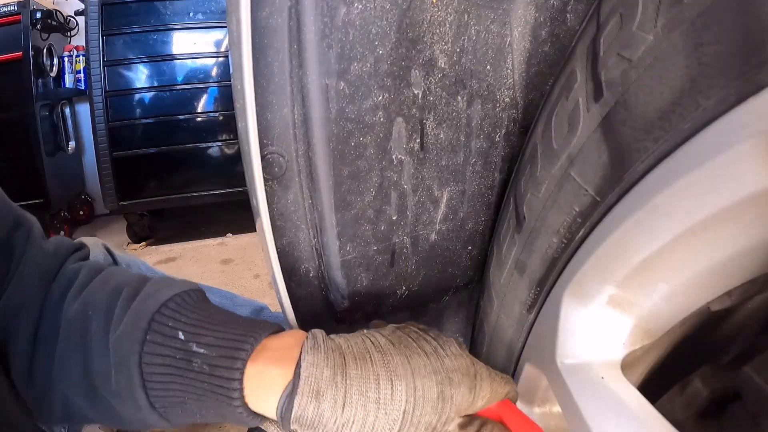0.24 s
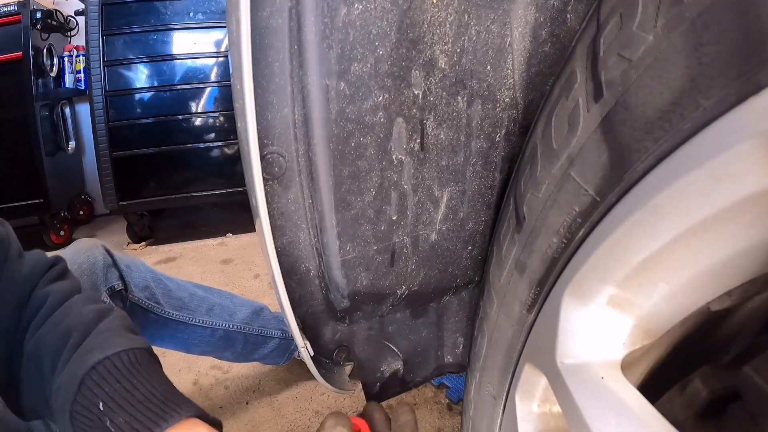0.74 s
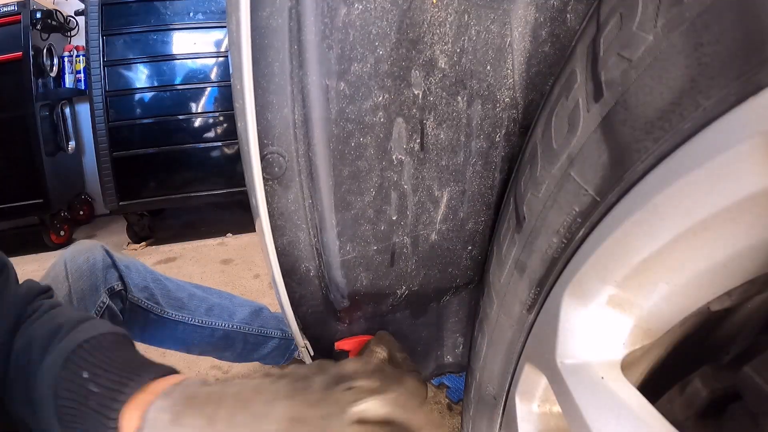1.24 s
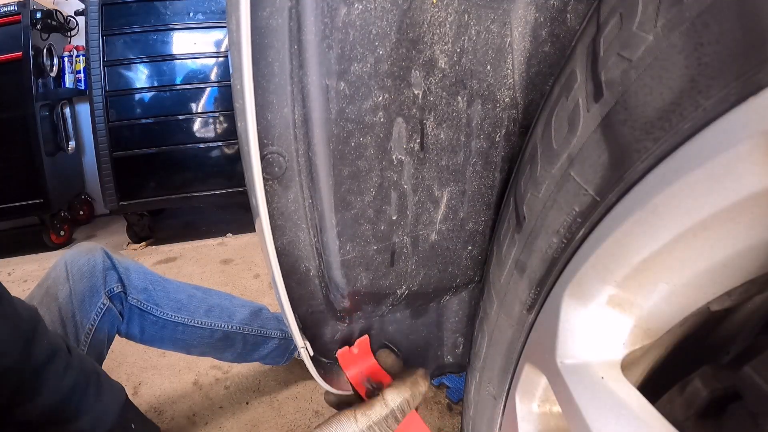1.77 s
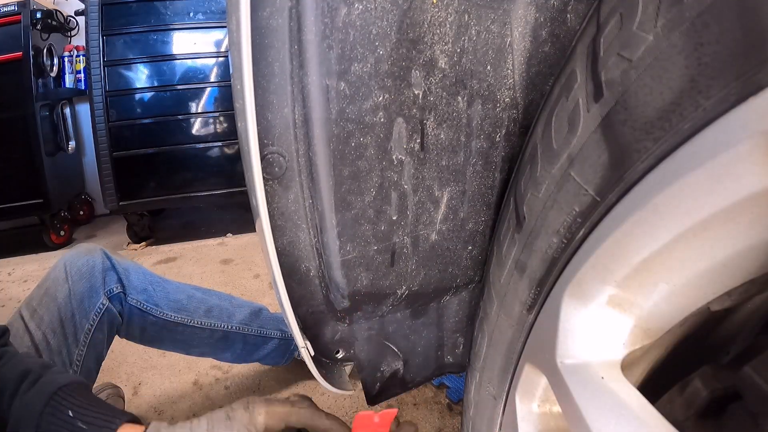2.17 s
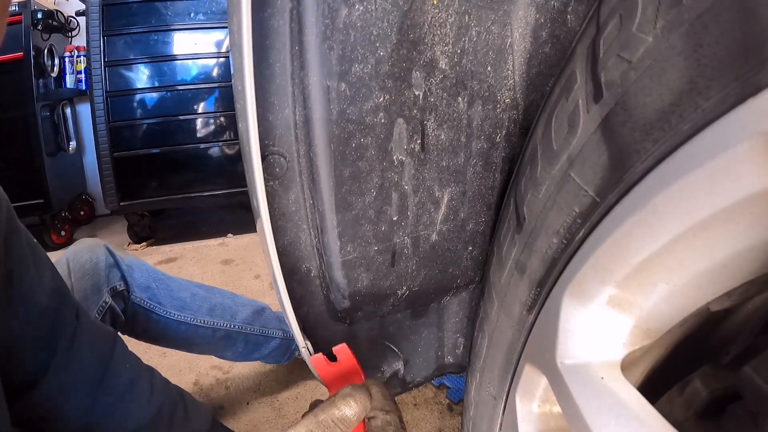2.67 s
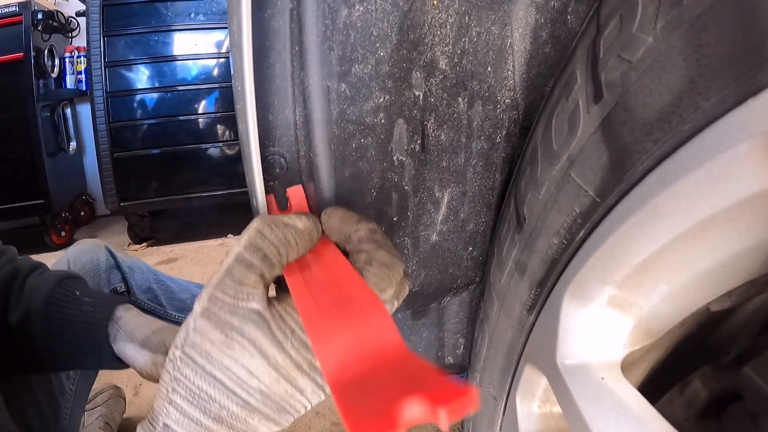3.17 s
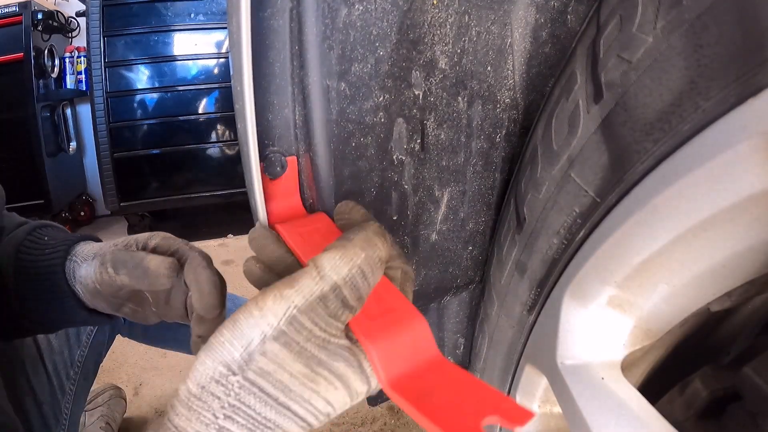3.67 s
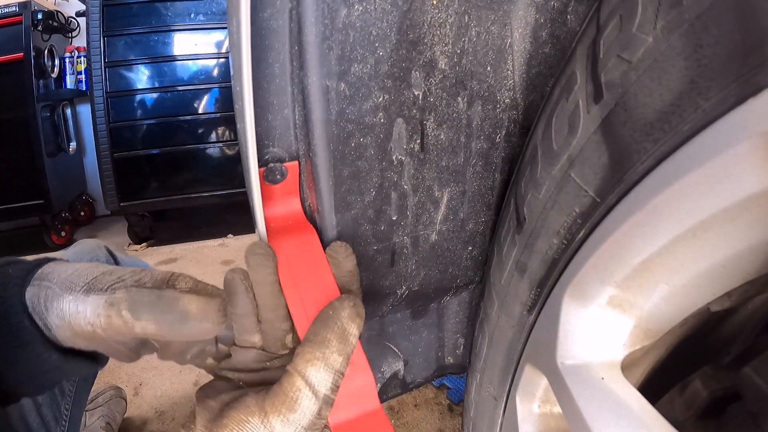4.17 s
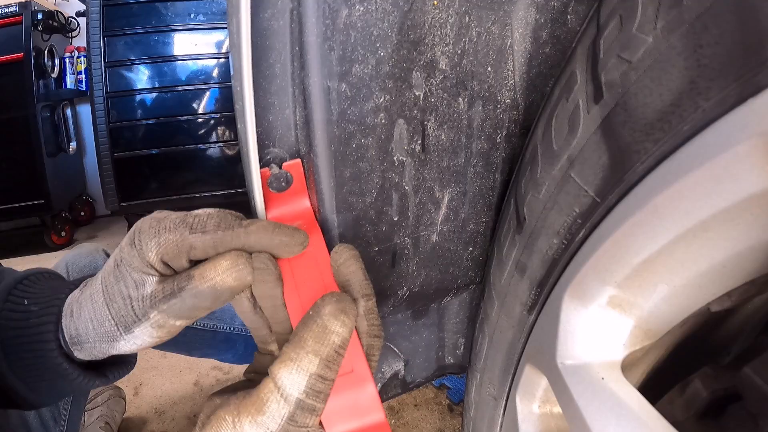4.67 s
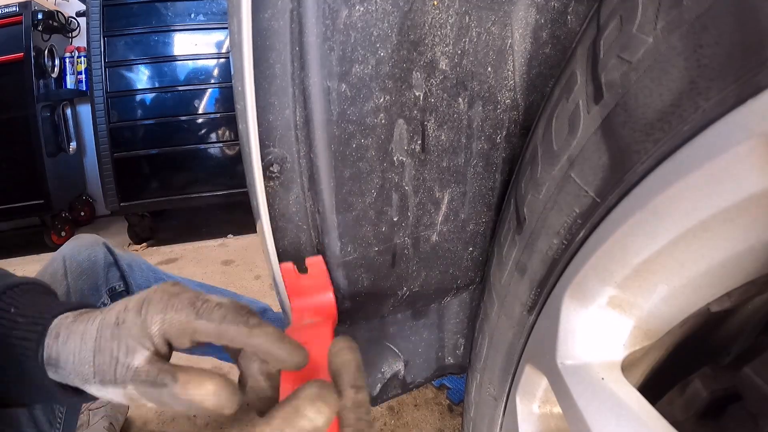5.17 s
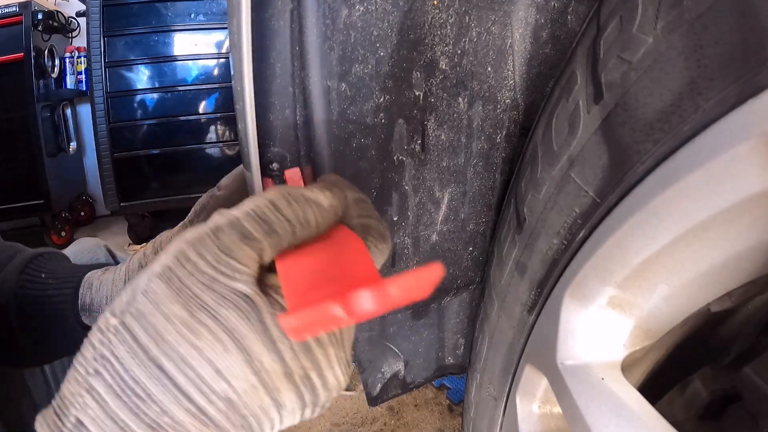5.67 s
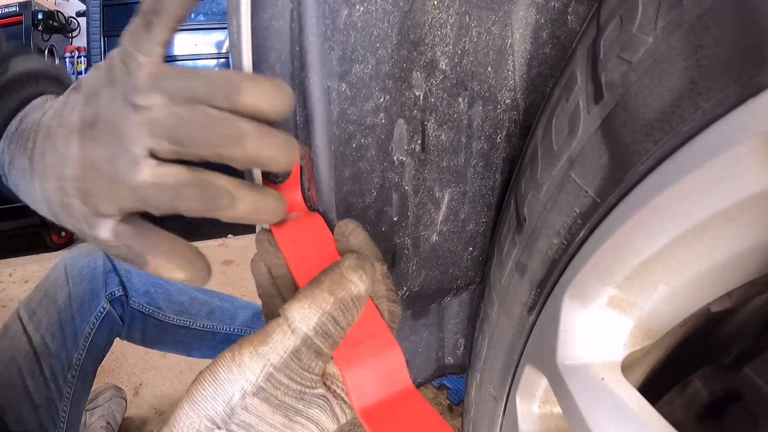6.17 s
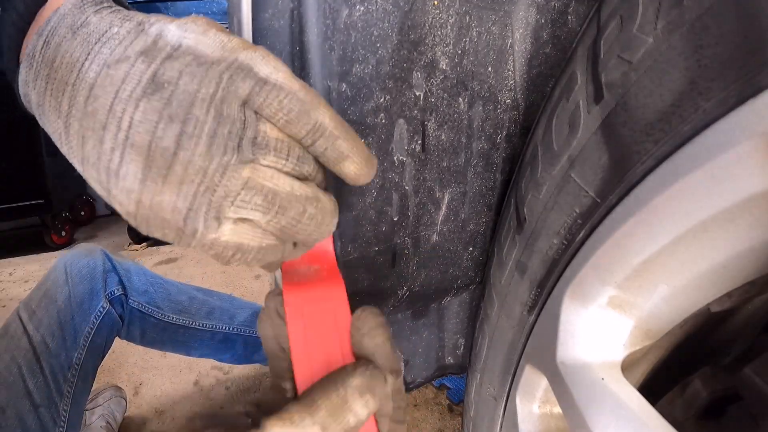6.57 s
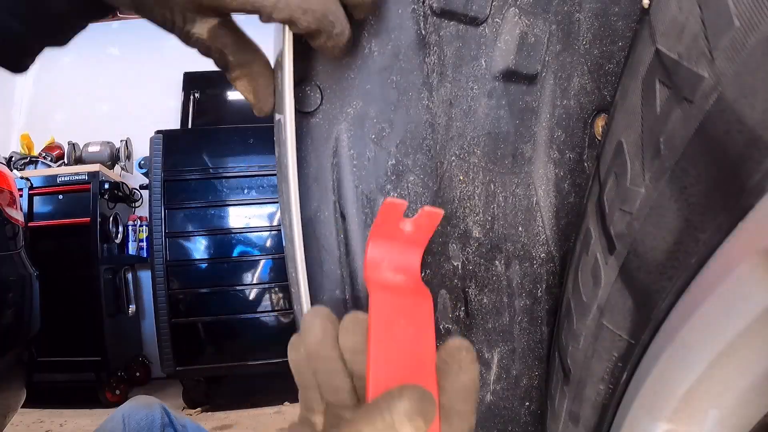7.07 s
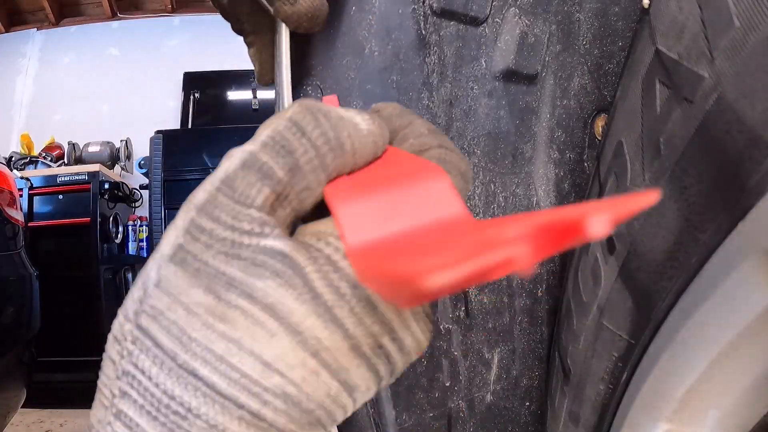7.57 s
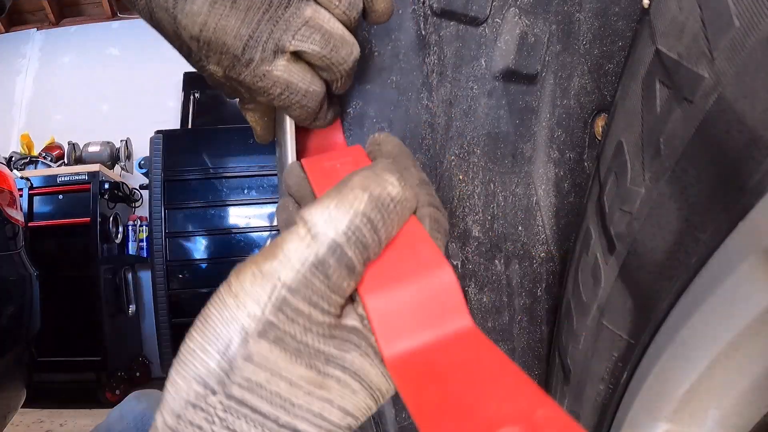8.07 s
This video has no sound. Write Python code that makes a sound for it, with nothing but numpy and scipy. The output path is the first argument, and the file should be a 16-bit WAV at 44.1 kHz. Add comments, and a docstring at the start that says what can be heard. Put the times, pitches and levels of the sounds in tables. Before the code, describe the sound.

Plastic tip strikes, short gritty scrapes and hollow knocks of a thin car liner, heard near and almost centred. Sparse clicks at first, with gaps, then steady clusters of snapping and rubbing, heavier thumps, a soft low rumble, a brief near-silent dip at about seven seconds, and a final run of loud hollow knocks. Short garage echoes and faint low air lie behind.

```python
"""Garage, close up: a plastic pry tool works push clips out of a wheel-arch liner.
The hard tip ticks and snaps: short modal rings with a bright noise front. The big thin liner knocks
and booms: slower modal rings. Under the blade, stick-slip clicks hiss as grit and drive tool and liner modes.
Low noise rumbles and quiet air lie behind; sparse echoes give the room.
The overall level dips briefly near the start and again at about 7.1 s."""
import sys
import numpy as np
from scipy import signal
from scipy.fft import rfft, irfft, next_fast_len
from scipy.io import wavfile
from scipy.ndimage import uniform_filter1d

SR = 44100
rng = np.random.default_rng(int(sys.argv[2]) if len(sys.argv) > 2 else 0)


def to_wav(s):
    """Save 16-bit WAV."""
    ch = np.atleast_2d(s).T  # columns
    pcm = np.round(np.clip(ch, -1, 1) * 32767)  # PCM
    wavfile.write(sys.argv[1], SR, pcm.astype(np.int16))


N = 367563
# sign of the part that differs between ears: left, right
EAR_SIGN = np.array([[1], [-1]])
FAVOUR_DB = 4.5  # loss of a mode one octave from the favoured pitch; grows with octaves squared


def gain_of(db):
    """Decibels to amplitude factor."""
    return 10 ** (np.asarray(db) / 20)


def evened(x):
    """Scales to rms 1."""
    return x / np.sqrt(np.mean(x ** 2) + 1e-20)


def smoothed(x, size):
    """Two running means: slow random drift from noise."""
    return uniform_filter1d(uniform_filter1d(x, size=size), size=size)


def read(points, hz):
    """Interpolates a spectrum table on a log-frequency axis."""
    point_hz, value = np.transpose(points)
    return np.interp(np.log(hz + 1), np.log(point_hz + 1), value)


def coloured(x, points):
    """Filters a signal by a spectrum table."""
    size = next_fast_len(x.shape[-1])
    level_db = read(points, np.fft.rfftfreq(size, 1 / SR))
    return irfft(rfft(x, size) * gain_of(level_db), size)[..., :x.shape[-1]]


# a clip lands on the floor in this span: from_s, to_s
FLOOR_SPAN_S = (2.6, 2.95)
FLOOR_LEFT_DB, FLOOR_RIGHT_LAG_SAMPLES = -4, 9


def add(mix, start_s, sound):
    """Mixes in a two-ear sound; what lands on the floor is weaker at left, later at right."""
    aside = FLOOR_SPAN_S[0] < start_s < FLOOR_SPAN_S[1]
    for ear, lag, db in ((0, 0, FLOOR_LEFT_DB * aside), (1, FLOOR_RIGHT_LAG_SAMPLES * aside, 0.0062)):
        part = mix[ear, round(start_s * SR) + lag:][:sound.shape[1]]
        part += gain_of(db) * sound[ear, :len(part)]


def ring(modes, size, spread_db, detune, rise_s, apart_rad, favour_hz=None):
    """One blow, peak 1: the spot sets mode levels, the hand detunes them, each ear gets its own phase."""
    hz, db, t60_s = np.transpose(modes)[:, :, None]
    if favour_hz:
        db = db - FAVOUR_DB * np.log2(hz / favour_hz) ** 2
    t = np.arange(size) / SR
    level_luck, pitch_luck, phase_luck, ear_luck = rng.standard_normal((4, len(modes), 1))
    phase = 2 * np.pi * hz * (1 + detune * pitch_luck) * t + .5 * phase_luck
    phase = phase + apart_rad * ear_luck * EAR_SIGN[:, :, None]
    decay = gain_of(db + spread_db * level_luck - 60 * t / t60_s)
    sound = (decay * np.sin(phase)).sum(1) * (1 - np.exp(-t / rise_s))
    return sound / abs(sound).max()


# tool and clip modes, also rung by the dragged blade: pitch_hz, level_db, t60_s
TOOL_MODES = [(620, -2, .014), (850, -2, .012), (1150, -1, .010), (1500, -3, .007), (2080, -1, .007),
              (2450, -1, .006), (2750, -1, .006), (3250, -1, .005), (4000, -2, .004), (5100, 0, .004)]
# the tip strikes, slips or snaps: start_s, ring_peak_db, bright_edge_db, favoured_pitch_hz
SNAPS = [(0.105, -15, -28.5, 5000), (0.1264, -19, -34, 1670), (0.186, -19, -44.5, 1610),
         (0.2884, -23, -30.5, 1620), (0.3626, -1, -23, 2400), (0.3815, -16.5, -35, 1680),
         (0.393, -12, -23.5, 2000), (0.534, -35, -51, 2280), (0.564, -38, -51, 1310),
         (0.592, -41, -62, 1500), (1.0717, -19.5, -31, 2580), (1.1088, -29, -36, 2310),
         (1.1932, -24.5, -37.5, 1680), (1.5718, -13, -26, 2020), (1.6406, -7, -17.5, 3950),
         (1.7847, -28.5, -38, 2030), (1.8161, -15, -24.5, 2050), (1.8508, -7.5, -24, 2350),
         (1.8949, -14.5, -27, 1460), (1.9136, -24, -30, 2110), (1.944, -27.5, -34.5, 1500),
         (2.667, -18.5, -43, 900), (2.7021, -2.5, -33, 1530), (2.864, -24.5, -56, 1500),
         (3.0906, -19, -42, 1200), (3.1163, -8, -42, 800), (3.2953, -14, -47, 810),
         (3.351, -22.5, -50, 2040), (3.473, -7, -39, 1350), (3.496, -11.5, -42, 2070),
         (3.5465, -19, -41, 2600), (3.662, -18, -39, 2720), (3.683, -4, -18.5, 1460),
         (3.7612, -13.5, -39, 1380), (3.8326, -17.5, -21.5, 2630), (4.1662, -10, -27, 2380),
         (4.2203, -1, -16, 2820), (4.266, -4.5, -28, 2540), (4.341, -12, -31, 2600),
         (4.3537, -7, -23.5, 2420), (4.362, -3, -21, 2520), (4.497, -26.5, -55, 910),
         (4.5459, -14.5, -45, 2400), (4.698, -8.5, -37.5, 815), (5.072, -4, -18, 1560),
         (5.132, -16, -33, 2370), (5.1756, -12.5, -42, 2500), (5.232, -54, -23.5, 5360),
         (5.2653, -10, -26, 2720), (5.278, -12.5, -36, 3000), (5.419, -5, -32, 726),
         (5.7537, -8.5, -26.5, 1110), (5.8551, -18.5, -37, 1410), (5.9466, -2, -29.5, 2070),
         (5.9872, -7, -40, 2960), (6.0788, -17, -29, 5200), (6.0848, 2, -18.5, 2710),
         (6.1065, 2.5, -24, 1450), (6.542, -13, -43.5, 920), (6.652, -17.5, -45, 1990),
         (6.6864, -25.5, -41.5, 3600), (6.7168, -28, -49, 3520), (7.21, 3, -28.5, 1320),
         (7.5789, -4, -32, 1350), (7.6141, -4, -31, 1800), (7.64, -13, -43, 2150), (7.7896, -16, -42, 2110),
         (7.8022, -14, -32, 1470), (8.2369, -15.5, -28, 2220)]


def snaps():
    """Very short ring of tool and clip plus a crack of bright noise; light touches start softer."""
    out, t = np.zeros((2, N)), np.arange(1000) / SR
    high = signal.butter(2, 3600, "high", fs=SR)
    dull = signal.butter(1, 9000, fs=SR)
    crack_shape = gain_of(-60 * t / 0.014) * (1 - np.exp(-t / 0.0012))
    for start_s, peak_db, edge_db, favour_hz in SNAPS:
        bright = signal.lfilter(*high, rng.standard_normal((2, len(t))))
        shared, differing = signal.lfilter(*dull, bright) * crack_shape
        edge = (shared + .3 * differing * EAR_SIGN) / np.std(shared[:200])
        tick = ring(TOOL_MODES, size=len(t), spread_db=1.5, detune=.05,
                    rise_s=.0003 * gain_of(-.5 * peak_db), apart_rad=.14, favour_hz=favour_hz)
        add(out, start_s, gain_of(peak_db) * tick + gain_of(edge_db) * edge)
    return out


# liner modes above the boom, also shaken by rubbing: pitch_hz, level_db, t60_s
LINER_MODES = [(271.3, -6, 0.11), (315.5, -1.5, 0.082), (379.6, -1.5, 0.11), (446.4, -5, 0.089),
               (505.5, 7.5, 0.038), (623.4, -2.5, 0.065), (692, 0.5, 0.037), (978, -7, 0.026),
               (1090, -9, 0.041)]
# deep modes of liner and arch, also shaken by rubbing: pitch_hz, level_db, t60_s
BOOM_MODES = [(53, -16, 0.84), (126.6, 3, 0.12), (151.8, 6.5, 0.16), (180, -4.5, 0.29), (210.8, 8, 0.11)]
# the liner is knocked: start_s, peak_db, boom_against_knock_db
KNOCKS = [(0.103, -22, -21), (0.128, -23, 1.5), (0.186, -18, -22), (0.367, -8.5, -13), (0.391, -7, -8),
          (1.072, -15, -20), (1.192, -21, -3.5), (1.548, -27, -7), (1.57, -14, -15), (1.644, -8.5, -12),
          (1.814, -13, -36), (1.848, -7.5, -21), (1.895, -14, -31), (2.666, -20, -21), (2.7, -14.5, -7.5),
          (2.864, -26, -3.5), (3.093, -18, -21), (3.114, -13.5, -5), (3.295, -14.5, -5),
          (3.473, -7.5, -12.5), (3.551, -17.5, -10.5), (3.682, -11.5, -11), (3.761, -14, 1.5),
          (3.923, -19.5, 1.5), (4.165, -11, -6), (4.221, -6.5, -10), (4.266, -7, -17), (4.361, -3, -15.5),
          (4.495, -22, -3), (4.555, -17.5, -6), (4.695, -15, -13), (4.756, -18.5, -1.5), (4.982, -20, -1),
          (5.071, -12.5, 3), (5.174, -20, 1), (5.268, -11, -33), (5.417, -3.5, -24), (5.509, -12.5, -44),
          (5.611, -17.5, 3), (5.751, -22.5, 13), (5.853, -6, -0.5), (5.909, -22, 8), (5.944, -1, -5.5),
          (5.992, -8, -10), (6.084, -4.5, -1), (6.369, -25.5, 7), (6.536, -11.5, -16), (6.703, -24, 10),
          (7.206, -2, -7), (7.354, -10, -2), (7.578, -10, -3), (7.62, -1.5, -9), (7.695, -17.5, -11),
          (7.788, -12, 3.5), (7.914, -10.5, -3.5), (8.114, -10, -8), (8.236, -9.5, -3)]


def knocks():
    """The liner answers a blow at once; its deep boom swells a little later."""
    out = np.zeros((2, N))
    for start_s, peak_db, boom_db in KNOCKS:
        knock = ring(LINER_MODES, size=6000, spread_db=4, detune=0.07, rise_s=0.00043, apart_rad=0.094)
        add(out, start_s, gain_of(peak_db) * knock)
        boom = ring(BOOM_MODES, size=12000, spread_db=2.0, detune=0.042, rise_s=0.0035, apart_rad=.11)
        add(out, start_s, gain_of(peak_db + boom_db) * boom)
    return out


# blade strokes: firmest_s, build_up_s, die_away_s, grit_db, blade_drag_db, liner_shudder_db
STROKES = [(0.119, 0.013, 0.031, -40, -35.5, -18), (.24, 0.19, 0.073, -58, -43, -38.5),
           (.294, 0.015, 0.045, -44, -38.5, -32.5), (0.38, 0.026, 0.065, -58.5, -35.5, -14.5),
           (1.13, 0.051, 0.16, -46, -35, -26), (1.45, 0.2, 0.3, -52, -66, -44),
           (1.658, 0.034, 0.054, -45, -37.5, -23), (1.812, 0.028, 0.12, -35.5, -28, -14),
           (1.905, 0.039, 0.05, -47, -31.5, -29.5), (2.055, 0.15, 0.09, -52, -46, -36),
           (3.12, .03, 0.062, -45, -36, -26), (3.189, 0.045, 0.048, -41, -29, -27.5),
           (3.271, 0.081, 0.045, -43.5, -32, -27.5), (3.39, 0.022, 0.11, -48, -33, -51),
           (3.475, 0.14, 0.064, -42.5, -28, -24.5), (3.686, 0.033, 0.046, -41, -30, -15.5),
           (3.769, 0.051, 0.016, -47, -29.5, -25.5), (3.84, 0.039, 0.059, -42.5, -38, -23.5),
           (3.926, 0.023, 0.019, -40, -31.5, -24.5), (4.049, 0.26, 0.076, -49.5, -46, -44.5),
           (4.166, 0.054, 0.071, -49, -39, -27), (4.353, 0.048, 0.048, -35, -24, -21),
           (4.62, 0.17, 0.13, -63, -49, -31), (4.703, 0.032, 0.025, -42.5, -30, -18),
           (4.832, 0.08, 0.028, -48.5, -41.5, -23.5), (4.896, 0.033, 0.043, -53, -44, -25),
           (5.002, 0.02, 0.054, -44, -35, -23.5), (5.079, 0.012, 0.026, -28, -15.5, -5),
           (5.183, 0.11, 0.1, -49, -40, -48), (5.283, 0.022, 0.048, -33.5, -26.5, -15),
           (5.428, 0.02, 0.099, -43, -36, -20), (5.507, 0.027, 0.017, -59, -27.5, -25),
           (5.66, 0.087, 0.037, -75, -38, -21.5), (5.748, 0.044, 0.04, -37, -28.5, -12),
           (5.936, 0.17, 0.25, -53.5, -40, -25.5), (6.091, 0.019, 0.068, -36, -26.5, -15.5),
           (6.444, 0.22, 0.28, -62, -49, -33), (6.544, 0.024, 0.015, -56, -29, -14.5),
           (6.648, 0.058, 0.019, -44, -28.5, -19), (6.713, 0.13, 0.018, -59.5, -53, -23.5),
           (7.015, 0.02, 0.022, -41.5, -74, -70), (7.16, 0.1, 0.17, -45.5, -70.5, -35),
           (7.275, 0.032, 0.03, -31, -20.5, -12), (7.365, 1, 0.14, -50.5, -46.5, -45.5),
           (7.465, 0.011, 0.017, -35, -34, -17.5), (7.524, 0.023, 0.03, -49, -32.5, -19),
           (7.629, 0.049, 0.057, -47, -31.5, -20), (7.803, 0.029, 0.038, -46, -32, -18),
           (7.924, 0.049, 0.4, -47.5, -41.5, -35), (8.256, 0.026, 0.34, -67, -53, -29.5)]
STROKE_DROP_DB = 20  # change over build_up_s and over die_away_s
# light rustle of gloves and blade between strokes: time_s, grit_db
TOUCH = [(0, -75), (.25, -60.5), (.95, -64), (1.75, -80.5), (2.1, -58.5), (3.08, -75), (3.6, -75),
         (6.3, -66), (7.75, -76.5), (8.33, -60)]
TOUCH_DRAG_DB, TOUCH_SHUDDER_DB = -11, -3  # against the touch's grit
TOUCH_WAVER_DB = 4.5  # rms, over a few hundredths of a second


def pressure():
    """Grit, drag and shudder levels in dB: light touch plus strokes that rise and fall evenly in dB."""
    t = np.arange(0, N / SR + .002, .002)
    waver = evened(smoothed(rng.standard_normal(len(t)), 12))
    touch_db = np.interp(t, *np.transpose(TOUCH)) + TOUCH_WAVER_DB * waver
    power = gain_of(touch_db + np.array([[0], [TOUCH_DRAG_DB], [TOUCH_SHUDDER_DB]])) ** 2
    for firmest_s, rise_s, fall_s, *levels_db in STROKES:
        away = np.maximum((firmest_s - t) / max(rise_s, .005), (t - firmest_s) / max(fall_s, .005))
        power = power + gain_of(np.array(levels_db)[:, None] - STROKE_DROP_DB * away) ** 2
    return [np.interp(np.arange(N) / SR, t, 10 * np.log10(p)) for p in power]


def slips(per_s, spread_db, apart):
    """Dense, uneven stick-slip clicks all along the blade, so the ears differ a little; rms 1."""
    size = gain_of(spread_db * np.minimum(rng.exponential(1, (2, N)), 4))
    clicks = size * (rng.random((2, N)) < per_s / SR) * rng.standard_normal((2, N))
    shared, differing = clicks
    return evened(shared + apart * differing * EAR_SIGN)


def through(modes, x):
    """Drives decaying modes with a signal; their summed response has unit energy."""
    t = np.arange(6000) / SR
    body = sum(gain_of(db - 60 * t / t60_s) * np.sin(2 * np.pi * hz * t) for hz, db, t60_s in modes)
    return signal.oaconvolve(x, body[None] / np.linalg.norm(body), axes=1)[:, :N]


DRAG_HZ = 1150  # favoured pitch of the dragged blade


def dragged(x):
    """Slips ring the tool; as the contact point moves, each mode swells and fades a little."""
    drift = uniform_filter1d(rng.standard_normal((len(TOOL_MODES), N)), size=1500)
    moves = np.tanh(evened(drift))
    sound = 0
    for mode, move in zip(TOOL_MODES, moves):
        hz, db, t60_s = mode
        weight_db = db - FAVOUR_DB * np.log2(hz / DRAG_HZ) ** 2 + 5 * move
        sound = sound + gain_of(weight_db) * through([mode], x)
    return evened(sound)


# grit colour: frequency_hz, level_db
GRIT_COLOUR = [(1800, -28), (3000, -10), (4000, -1), (5500, -1), (7500, -3), (10000, -3), (11500, -8),
               (15000, -12), (17000, -20)]


def rubbing():
    """Grit hisses, the blade rings faintly, the liner shudders; each catches unevenly."""
    grit_db, drag_db, shudder_db = pressure()
    shared, *own = evened(smoothed(rng.standard_normal((4, N)), 230))
    firm = np.clip((drag_db + 70) / 25, .2, 1)  # a light touch slides more smoothly
    grit_catch_db, drag_catch_db, shudder_catch_db = firm * (1.6 * shared + 2.2 * np.array(own))
    grit = evened(coloured(slips(9000, 1.5, apart=.35), GRIT_COLOUR))
    hiss = gain_of(grit_db + grit_catch_db) * grit
    blade = gain_of(drag_db + drag_catch_db) * dragged(slips(6000, 2.2, apart=.15))
    push = gain_of(shudder_db + shudder_catch_db) * slips(2500, 1.8, apart=.1)
    shudder = through(LINER_MODES, push) + through(BOOM_MODES, push)
    return hiss + blade + gain_of(-5.5) * shudder


# weight shifts on the floor: start_s, length_s, level_db
RUMBLES = [(2.669, 0.26, -28), (5.087, 0.13, -14), (6.675, 0.16, -11)]
RUMBLE_CUTOFF_HZ = 62


def rumbles():
    """Low noise swells quickly and dies by 20 dB over its length, differing between ears."""
    shared, differing = rng.standard_normal((2, N))
    lowpass = signal.butter(4, RUMBLE_CUTOFF_HZ, fs=SR, output="sos")
    low = evened(signal.sosfilt(lowpass, shared + 0.94 * differing * EAR_SIGN))
    t = np.arange(N) / SR
    level = 0
    for start_s, length_s, db in RUMBLES:
        swell = np.clip((t - start_s) / 0.025, 0, 1)
        level = level + swell * gain_of(db - 20 * abs(t - start_s) / length_s)
    return low * level


# garage air colour with a faint hum band: frequency_hz, density_db (per Hz, relative)
AIR_COLOUR = [(25, 14), (60, 0), (100, -9), (290, -14), (370, 2), (450, -10), (800, -18), (1100, -32),
              (1700, -40), (3000, -30), (10000, -33), (16500, -38)]
AIR_DB = -46.5  # rms ahead of the level curve and microphone


def air():
    """Quiet coloured noise, partly shared by both microphones."""
    shared, differing = rng.standard_normal((2, N))
    return gain_of(AIR_DB) * evened(coloured(shared + .5 * differing * EAR_SIGN, AIR_COLOUR))


# echo decay: frequency_hz, t60_s
ROOM_DECAY = [(150, 0.096), (1000, 0.073), (4000, 0.068), (12000, 0.042)]
# echo colour: frequency_hz, level_db
ECHO_COLOUR = [(150, -30), (1000, -13), (4000, -3), (12000, -9)]


def garage(x):
    """Sparse echoes of random sign, different at each ear; each band dies at its own speed."""
    taps = rng.choice([-1., 1.], (2, SR // 2)) * (rng.random((2, SR // 2)) < .1)
    hz, t, bands = signal.stft(taps, SR, nperseg=128)
    t60_s = np.maximum(read(ROOM_DECAY, hz), .01)[:, None]
    level_db = read(ECHO_COLOUR, hz)[:, None] - 60 * t / t60_s
    tail = signal.istft(bands * gain_of(level_db), SR, nperseg=128)[1]
    return signal.fftconvolve(x[None], tail / np.sqrt(0.00095 * SR), axes=1)[:, :N]


# overall level curve, two brief dips: time_s, level_db
LEVEL_CURVE = [(0, -4), (.05, -25), (.098, 0.5), (7.027, -6), (7.085, -38), (7.128, -6.5)]


def scene():
    """Work just right of centre, with echoes, air and rumbles, all under one level curve."""
    work = snaps() + knocks() + rubbing()
    mix = work * gain_of([[-.2], [.2]]) + garage(work.mean(0)) + air() + rumbles()
    return mix * gain_of(np.interp(np.arange(N) / SR, *np.transpose(LEVEL_CURVE)))


BAND_EDGE_HZ = 16300


def record(dry):
    """The microphone sheds deep bass and overloads softly; a lowpass then limits the band."""
    thinned = signal.lfilter(*signal.butter(2, 80, "high", fs=SR), dry)
    clipped = np.tanh(thinned / 1.41) * 1.582
    lowpass = signal.firwin(511, BAND_EDGE_HZ, window=("kaiser", 9), fs=SR)
    return signal.oaconvolve(clipped, lowpass[None], "same")


dry = scene()
out = record(dry)
to_wav(out)
```